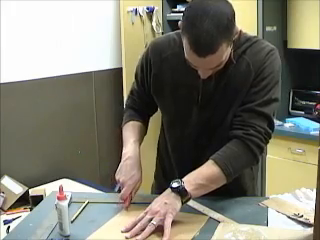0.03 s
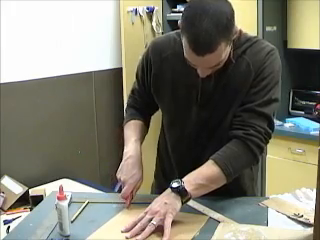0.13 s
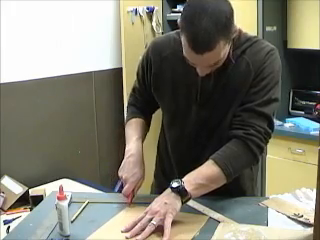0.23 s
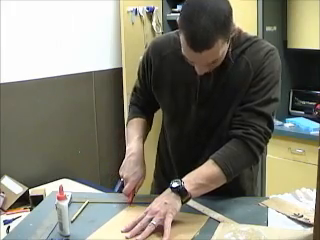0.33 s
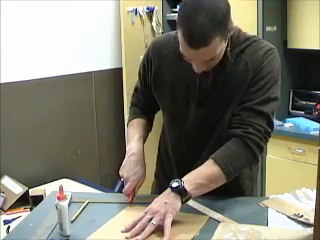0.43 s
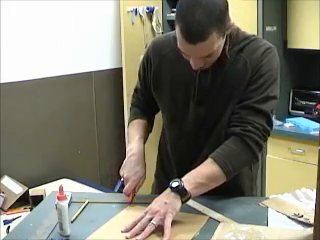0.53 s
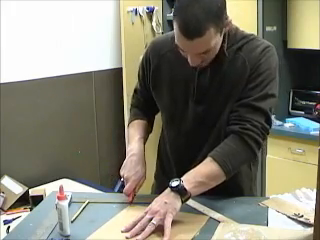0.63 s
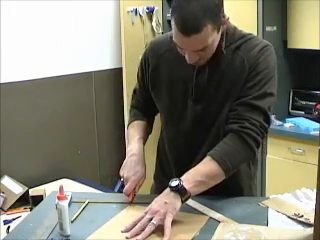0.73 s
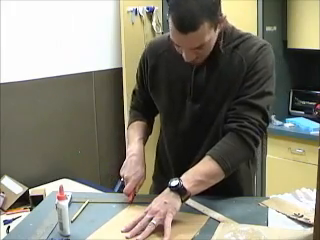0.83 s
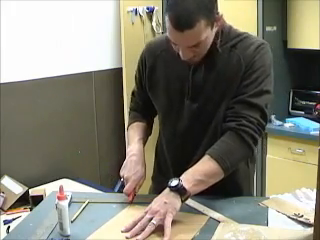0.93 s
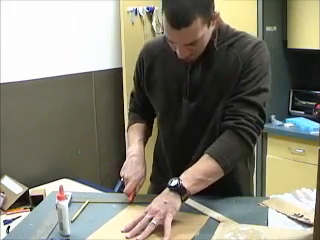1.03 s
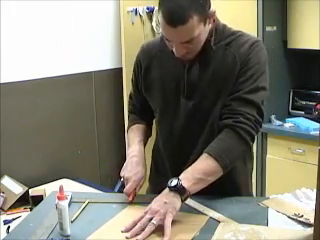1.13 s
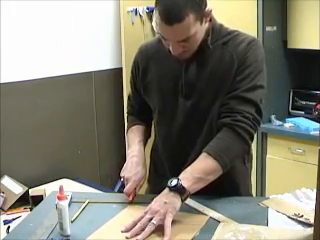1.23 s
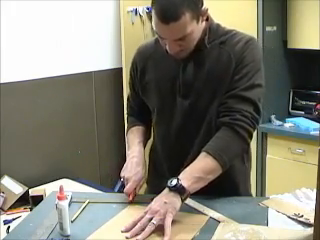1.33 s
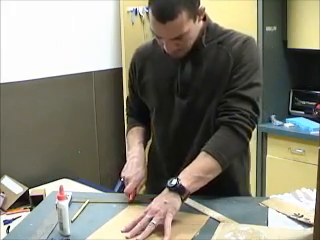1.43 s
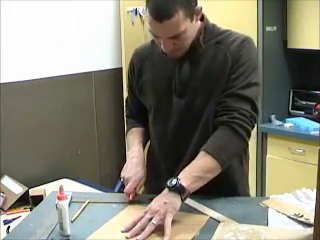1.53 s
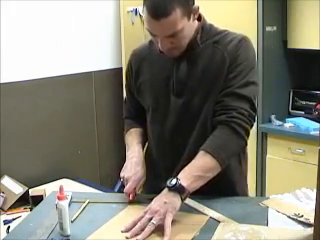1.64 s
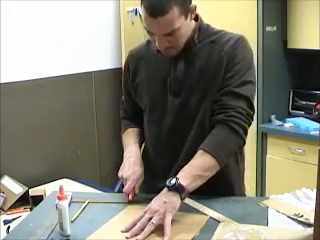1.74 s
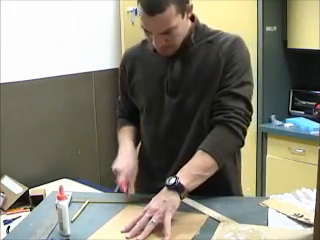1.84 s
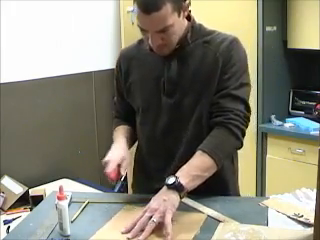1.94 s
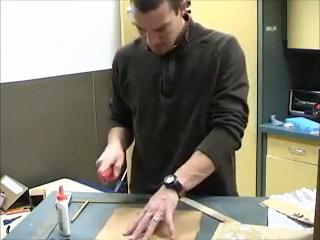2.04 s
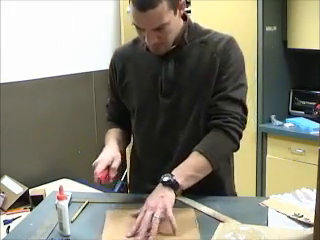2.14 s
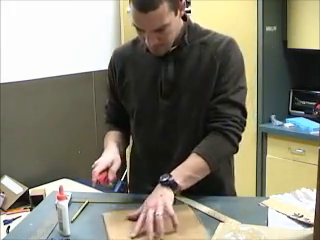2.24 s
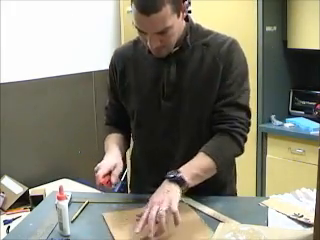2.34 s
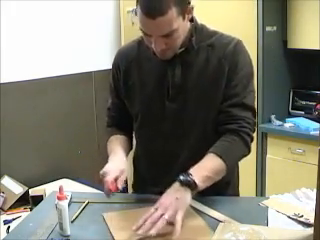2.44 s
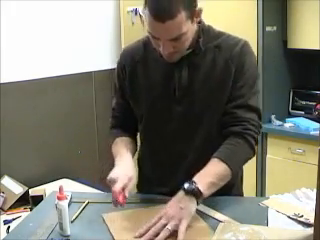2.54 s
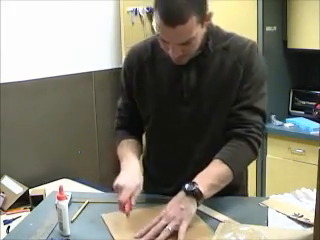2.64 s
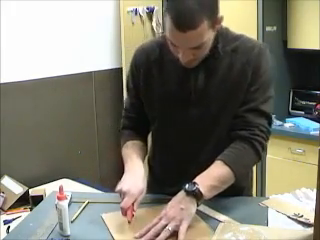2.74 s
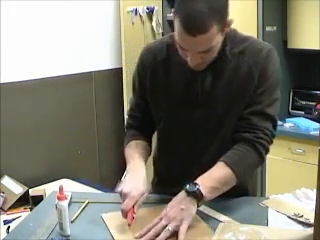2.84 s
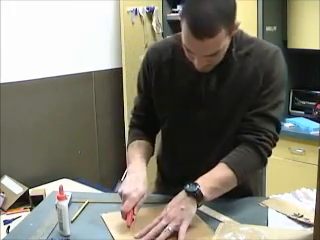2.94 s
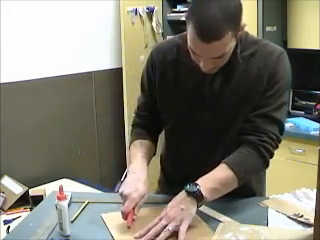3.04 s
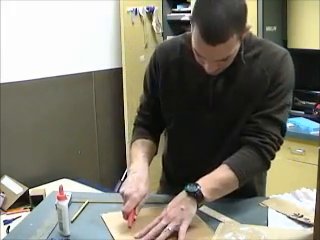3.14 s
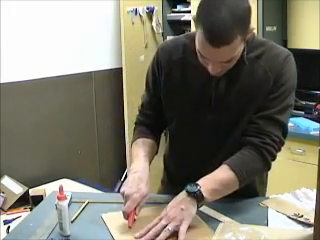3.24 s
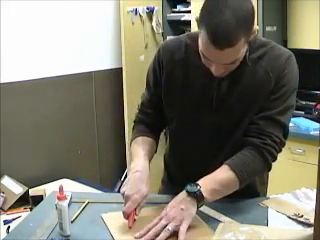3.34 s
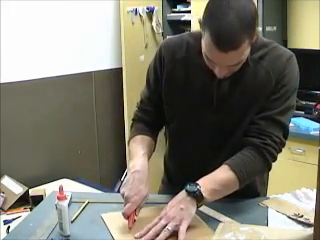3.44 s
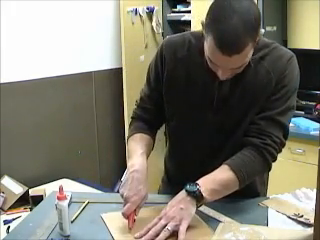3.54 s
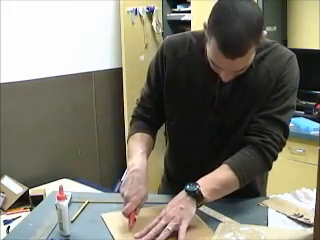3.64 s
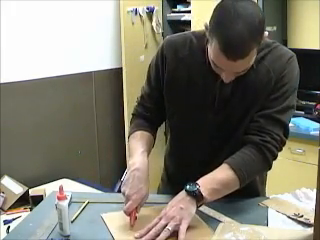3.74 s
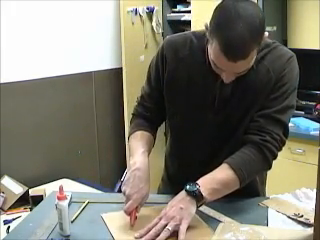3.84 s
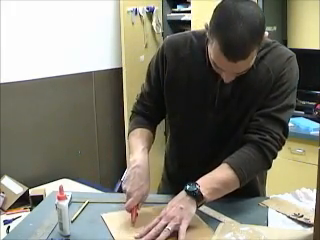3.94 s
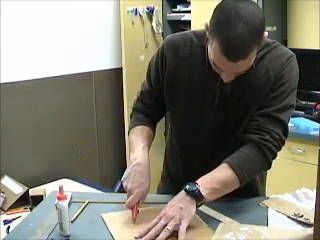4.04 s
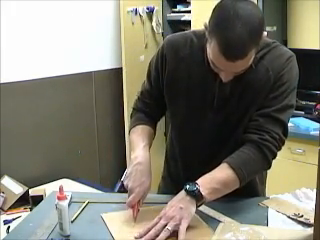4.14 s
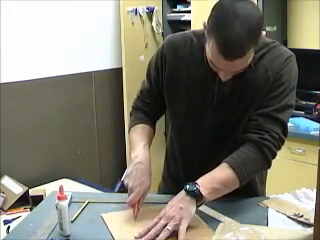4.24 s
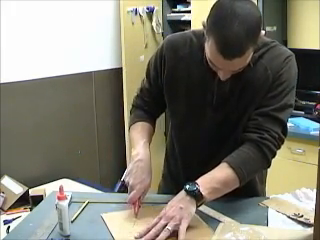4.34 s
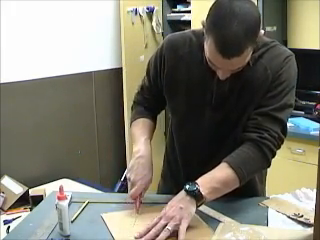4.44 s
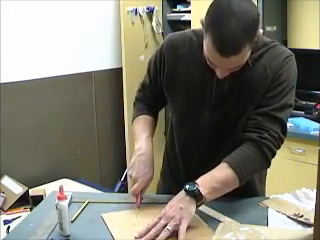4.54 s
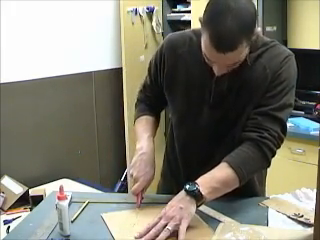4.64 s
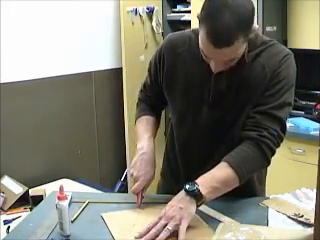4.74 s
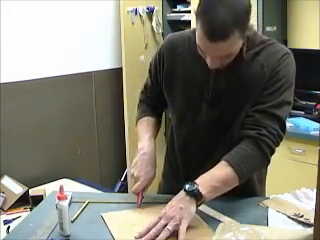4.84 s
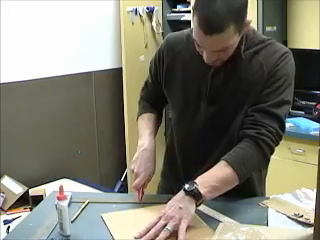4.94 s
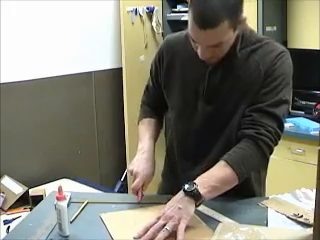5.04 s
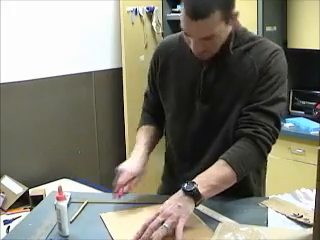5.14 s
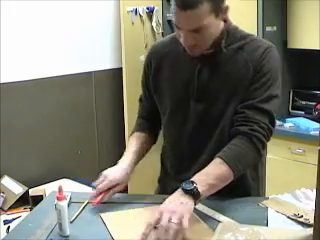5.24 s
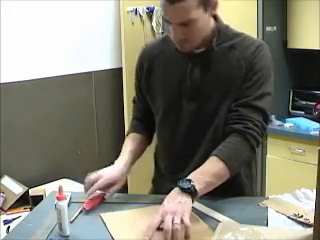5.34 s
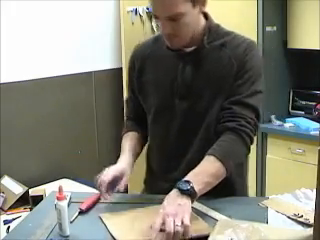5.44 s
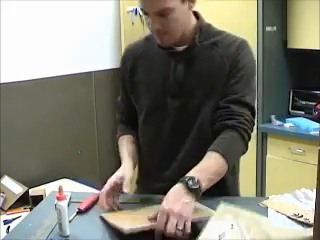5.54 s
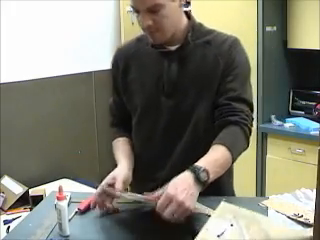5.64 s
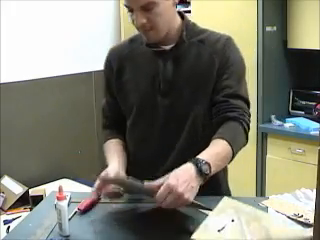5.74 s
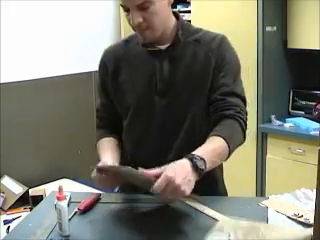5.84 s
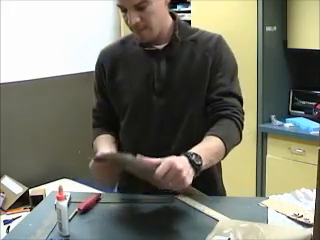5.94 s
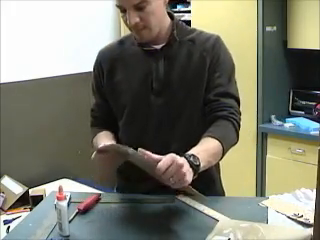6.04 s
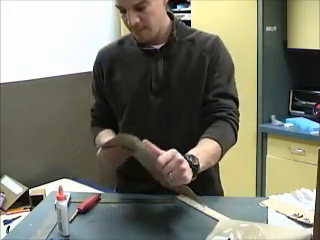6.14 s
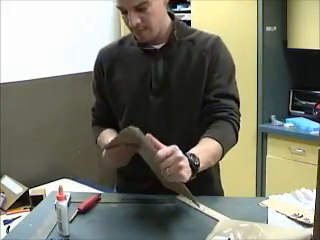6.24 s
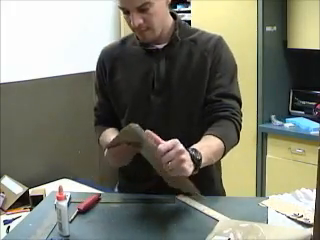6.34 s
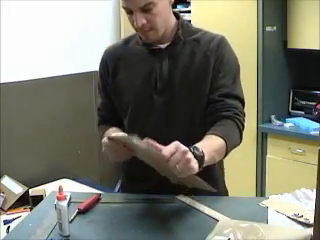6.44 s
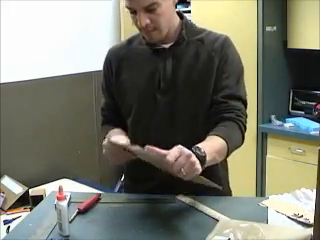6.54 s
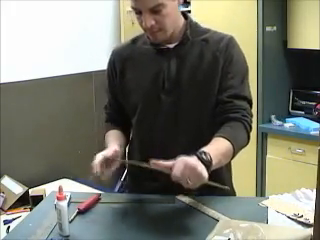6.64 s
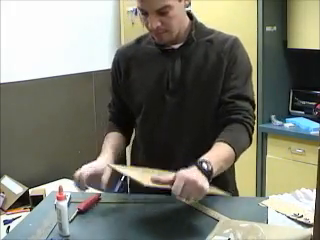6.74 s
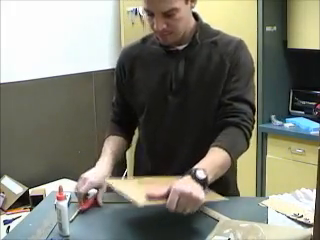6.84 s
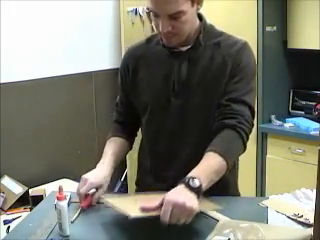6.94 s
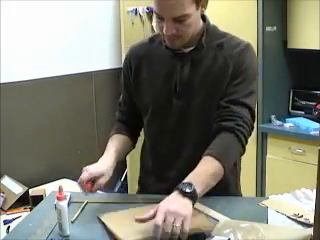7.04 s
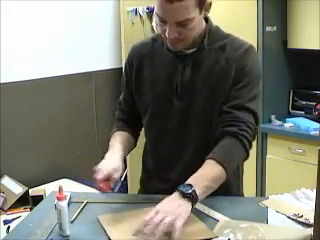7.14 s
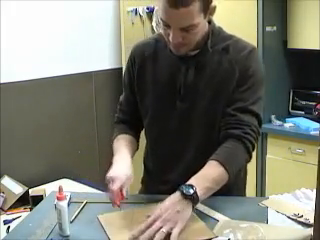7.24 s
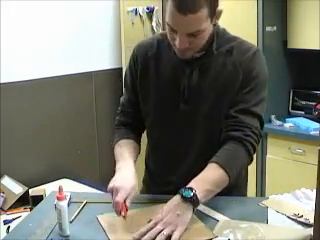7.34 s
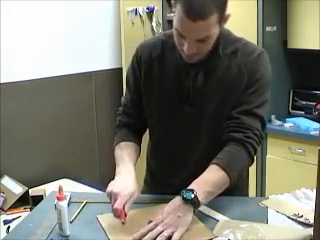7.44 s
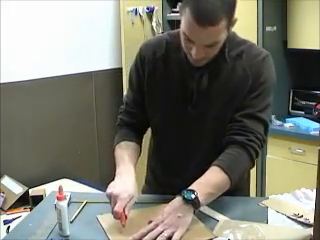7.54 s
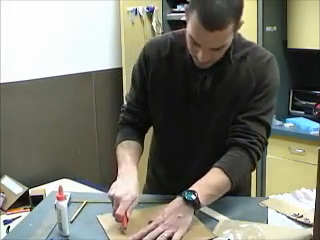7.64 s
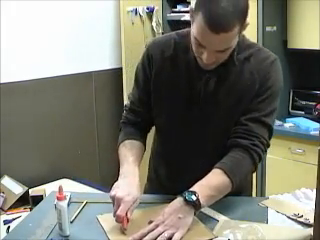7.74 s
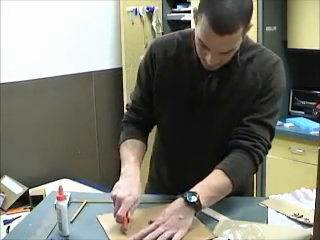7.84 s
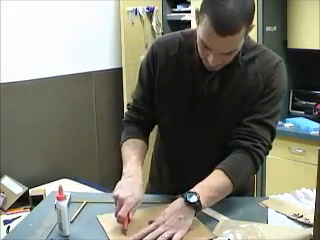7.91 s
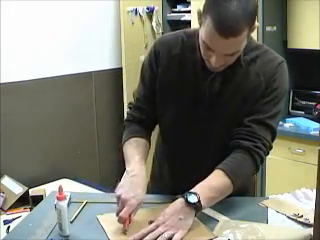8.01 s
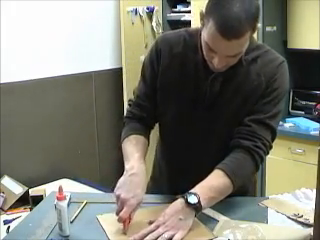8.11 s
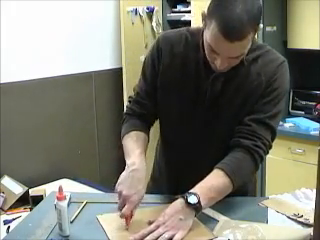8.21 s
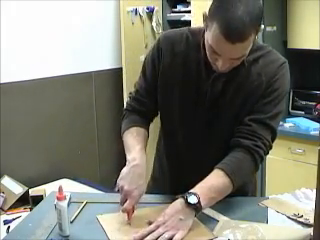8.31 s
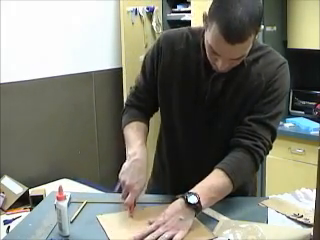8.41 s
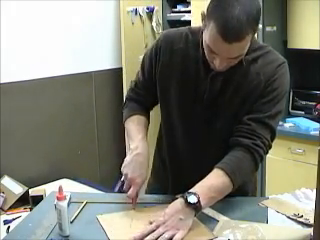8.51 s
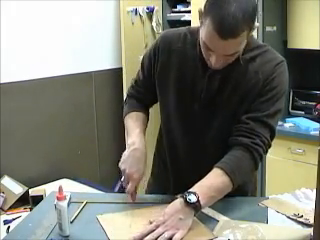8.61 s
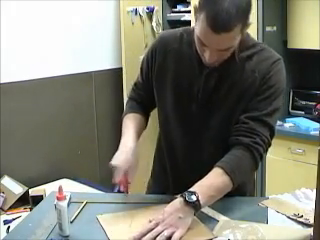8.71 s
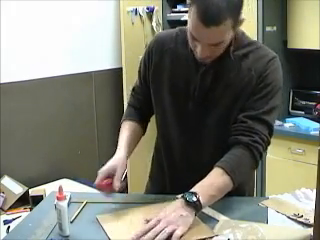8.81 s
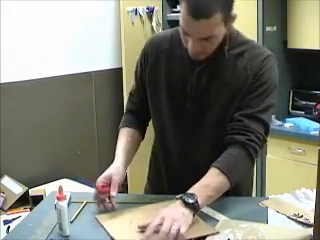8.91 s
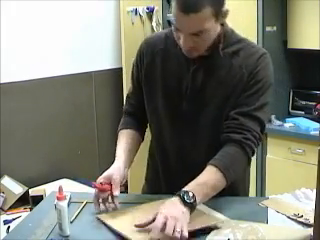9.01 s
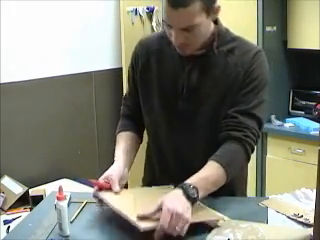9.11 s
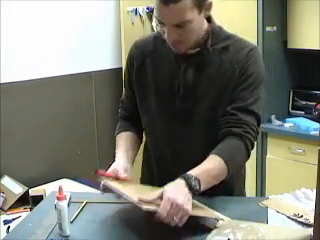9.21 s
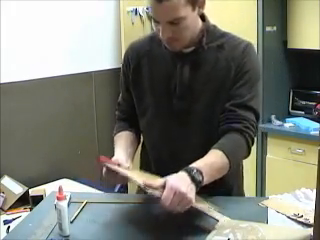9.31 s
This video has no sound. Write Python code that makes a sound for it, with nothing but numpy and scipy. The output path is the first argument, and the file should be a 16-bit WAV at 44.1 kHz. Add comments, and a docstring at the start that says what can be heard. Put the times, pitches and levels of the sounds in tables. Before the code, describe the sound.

Scratchy blade cuts in cardboard, papery shuffles and hollow table knocks, then one loud ripping pull, in a small humming workshop.

```python
"""A box cutter is drawn through corrugated cardboard on a worktable in a small workshop.
The cuts, slides and drags are dense showers of snapping fibres, filtered and levelled in three zones.
Snaps and blows are sharp contacts; knocks and worktop booms are decaying modes.
A tape camcorder hears it through the room's short ring, over mains hum, motor whine and moving air."""
import sys
import numpy as np
from scipy import signal
from scipy.fft import rfft, irfft
from scipy.io import wavfile

SR = 44100
rng = np.random.default_rng(int(sys.argv[2]) if len(sys.argv) > 2 else 0)


def to_wav(s):
    """Save 16-bit WAV."""
    ch = np.atleast_2d(s).T  # columns
    pcm = np.round(np.clip(ch, -1, 1) * 32767)  # PCM
    wavfile.write(sys.argv[1], SR, pcm.astype(np.int16))


N = 413216
TIME = np.arange(N) / SR
ROOM_DB = -3.5  # echoes of a clack re its direct sound

# zones of every contact: board body, rasp, paper fizz: low_hz, high_hz
ZONES = [(80, 1200), (1200, 5000), (5000, 12500)]
# spectrum of a blow on the table: freq_hz, level_db
BLOW_COLOUR = [(80, -32.5), (210, -12), (340, -7.5), (470, -5), (650, 4), (900, 6), (1300, 7), (1850, 7.5),
               (2600, 6.5), (3500, 1.5), (4800, 1.5), (9500, -9), (12000, -16)]


def undb(db):
    """Decibels to gain."""
    return 10 ** (np.asarray(db) / 20)


def unit(x):
    """Scale to rms 1."""
    return x / np.sqrt(np.mean(x ** 2) + 1e-18)


def band(x, lo_hz, hi_hz):
    """Causal band-pass."""
    sos = signal.butter(3, [lo_hz, hi_hz], "band", fs=SR, output="sos")
    return signal.sosfilt(sos, x + 1e-18)


def in_zones(x, levels_db):
    """Split into body, rasp and fizz; set the level of each."""
    return sum(unit(band(x, *zone)) * undb(db) for zone, db in zip(ZONES, levels_db))


def resonate(x, hz, width_hz):
    """One resonance, gain 1 at its centre."""
    return signal.lfilter(*signal.iirpeak(hz, hz / width_hz, fs=SR), x + 1e-18)


def colour(x, points, size=4096):
    """Minimum-phase filter through (freq_hz, level_db) points."""
    hz, db = np.transpose(points)
    bin_hz = np.arange(size // 2 + 1) * SR / size
    log_gain = np.log(undb(np.interp(np.log(bin_hz + 1), np.log(hz), db)))
    cepstrum = irfft(log_gain)[:size // 2]
    cepstrum[1:] *= 2  # folding makes it causal
    impulse = irfft(np.exp(rfft(cepstrum, size)))
    return signal.fftconvolve(x, impulse)[:len(x)]


def walk(rate_hz, n):
    """Random values joined by straight lines, spread near 1."""
    steps = np.arange(n) / SR * rate_hz
    return 1.2 * np.interp(steps, np.arange(4096), rng.standard_normal(4096))


def add(out, s, x):
    """Mix x into out from time s on."""
    i = max(int(s * SR), 0)
    out[i:i + len(x)] += x[:max(N - i, 0)]


def room_tail(size=16384):
    """Dense reflections of a small hard room, energy 1; the treble dies first."""
    # decay time per zone: t60_s
    zone_t60_s = [0.35, 0.31, 0.27]
    t = np.arange(size) / SR
    noise = rng.standard_normal(size)
    tail = sum(band(noise, *zone) * np.exp(-np.log(1000) * t / t60_s)
               for zone, t60_s in zip(ZONES, zone_t60_s))
    onset = np.clip(t / 0.0021, 0, 1)
    return unit(tail * onset) / np.sqrt(size)


def in_room(x, wet_db):
    """Direct sound plus reflections; each call draws its own echoes."""
    wet = undb(wet_db)
    out = wet * signal.fftconvolve(x, room_tail())
    out[:len(x)] += x
    return out / np.sqrt(1 + wet ** 2)


def board(x):
    """The sheet passes a push on and rings a little with it."""
    # resonances of the sheet on the table: freq_hz, width_hz, level_db
    resonances = [(214, 11, 10), (621, 68, -1.5), (1046, 56, -3.5), (1613, 33, 0.5), (1870, 94, -15),
                  (3240, 190, -11)]
    return x + sum(undb(db) * resonate(x, hz, width_hz) for hz, width_hz, db in resonances)


def friction(movements, spectrum, fibres_per_s, spread_db, catch_rate_hz, catch_db, wet_db):
    """Fibres break one by one; the edge catches and slips, so strong breaks come in clusters."""
    out = np.zeros(N)
    for movement in movements:
        s, rasp_db, body_db, fizz_db = np.transpose(movement)
        t = np.arange(s[0], s[-1], 1 / SR)
        chance, size, sign = rng.random((3, 2 * SR))[:, :len(t)]
        strength = undb(-spread_db * np.log(size + 0.087))
        breaks = (chance < fibres_per_s / SR) * np.sign(sign - .5) * strength
        catches = undb(catch_db * walk(catch_rate_hz, len(t)))
        sound = colour(board(breaks * catches), spectrum)
        levels_db = [np.interp(t, s, db) for db in (rasp_db + body_db, rasp_db, rasp_db + fizz_db)]
        fade = np.clip(np.minimum(t - s[0], s[-1] - t) / 0.00055, 0, 1)
        add(out, s[0], in_room(in_zones(sound, levels_db) * fade, wet_db))
    return out


def strokes(table, release_db_per_s, body_db, fizz_db):
    """Each stroke rises evenly, swells or eases, dies away; a bright one has more fizz, less body."""
    depth_db = 25
    out = []
    for start_s, length_s, attack_s, db, swell_db, bright_db in table:
        t = np.linspace(0, length_s + depth_db / release_db_per_s, 256)
        rise_db = 20 * np.log10(np.clip(t / attack_s, undb(-depth_db), 1))
        swelling_db = swell_db * np.minimum(t / length_s, 1)
        release_db = release_db_per_s * np.maximum(t - length_s, 0)
        level_db = db + rise_db + swelling_db - release_db
        out.append([(start_s + s, now_db, body_db - bright_db, fizz_db + bright_db)
                    for s, now_db in zip(t, level_db)])
    return out


def sweep(curve, body_db, fizz_db, body_growth, fizz_growth):
    """One long movement: body and fizz grow by their own number of dB for each dB of rasp."""
    s, db = np.transpose(curve)
    below_peak_db = db.max() - db
    body = body_db + (1 - body_growth) * below_peak_db
    fizz = fizz_db + (1 - fizz_growth) * below_peak_db
    return [np.column_stack([s, db, body, fizz])]


def contact(crumble_s, crumble_db, size=8192):
    """One sharp push, then a dying shower of smaller contacts."""
    t = np.arange(size) / SR
    shower = rng.standard_normal(size) * (rng.random(size) < .1) * np.exp(-t / crumble_s)
    push = undb(crumble_db) * unit(shower) / np.sqrt(size)
    push[0] += 1
    return push


def hits(table, spectrum, crumble_s, crumble_db, wet_db):
    """Contacts through the sheet, each fading into an even wash of echoes."""
    out = np.zeros(N)
    for s, db, body_db, fizz_db in table:
        push = contact(crumble_s, crumble_db, size=12000)
        echoes = undb(wet_db) * room_tail(size=12000)
        sound = colour(board(push / np.linalg.norm(push) + echoes), spectrum)
        add(out, s, in_zones(sound, (db + body_db, db, db + fizz_db)))
    return out


def mode(hz, t60_s, size=8192):
    """A struck mode dying away."""
    t = np.arange(size) / SR
    return np.sin(2 * np.pi * hz * t) * np.exp(-np.log(1000) * t / t60_s)


def cuts():
    """Short cuts: the blade bites, runs and stops, breaking fibres."""
    # start_s, length_s, attack_s, level_db, swell_db, brightness_db
    table = [(0.0, 0.19, 0.0013, -33.5, -5.5, 0.5), (0.218, 0.032, 0.019, -32, -3.5, -1),
             (0.274, 0.12, .01, -32.5, -4.5, 0), (0.84, 0.05, 0.042, -41.5, 1.5, 3.5),
             (3.743, 0.058, 0.0047, -35.5, -4.5, 1.5), (3.802, 0.019, 0.013, -40, 4.5, 0.5),
             (3.979, 0.13, .005, -34, 4.5, -0.5), (4.165, 0.048, 0.0095, -36.5, -4, -3.5),
             (4.27, 0.047, 0.03, -34.5, -1.5, 0), (4.35, .087, 0.017, -31.5, -5.5, 0.5),
             (4.441, 0.19, .004, -32.5, 4, -0.5), (4.752, 0.041, 0.036, -33.5, -2, 2),
             (4.958, 0.056, 0.0072, -36.5, 5, -2)]
    # freq_hz, level_db
    spectrum = [(50, -20), (92, 2.5), (140, -7.5), (210, -9.5), (280, -4.5), (450, -10), (650, -3),
                (900, -7), (1400, -2), (2200, 11.5), (3800, 9), (6000, -1.5), (9000, -1.5), (12000, -15)]
    movements = strokes(table, release_db_per_s=430, body_db=-2.5, fizz_db=-3.5)
    return friction(movements, spectrum, fibres_per_s=3000, spread_db=3,
                    catch_rate_hz=105.6, catch_db=3.0, wet_db=-3.5)


def pull():
    """One long, hard pull of the blade, its fibre shower following a rasp curve."""
    # time_s, rasp_db
    curve = [(8.22, -60), (8.278, -33), (8.308, -40), (8.316, -32.5), (8.398, -33.5), (8.43, -22),
             (8.498, -30), (8.548, -18.5), (8.64, -23.5), (8.708, -33), (8.724, -59), (8.82, -77)]
    # freq_hz, level_db
    spectrum = [(80, -1), (150, -12), (240, -9), (330, 1.5), (450, -11), (620, -0.5), (760, 5.5),
                (940, 0.5), (1090, 6), (1250, 0), (1400, -3), (1750, 0.5), (2400, -3.5), (3500, -0.5),
                (5200, -11.5), (9000, -16.5), (12000, -24.5)]
    movements = sweep(curve, body_db=-8.5, fizz_db=-12.5, body_growth=0.6, fizz_growth=0.73)
    return friction(movements, spectrum, fibres_per_s=3000, spread_db=4.0,
                    catch_rate_hz=220, catch_db=1.0, wet_db=-3.0)


def snaps():
    """The liner pops under the blade or cracks along the cut: a push and a brief crumble."""
    # start_s, rasp_db, body_re_rasp_db, fizz_re_rasp_db
    table = [(0.0276, -51, -8, 5), (0.2783, -41.5, -6, 1.5), (0.739, -55, 1, -10), (1.1243, -59.5, -2, -13),
             (1.3997, -64, -9, 6), (1.4865, -55.5, -7, 2.5), (1.529, -46.5, -9, -8), (1.7549, -57, -5, -7),
             (2.6366, -50.5, -14, -6), (3.0624, -61, -1, -14), (3.3808, -57.5, -5, -14),
             (3.528, -35, -5, -0.5), (3.5339, -48.5, 10.5, -14), (3.9802, -55, -4, 7.5),
             (4.1045, -45.5, 0, -2), (4.4424, -43.5, -8, -0.5), (4.4976, -43.5, -22, -0.5),
             (4.5942, -41, -9, 3.5), (4.9681, -52, -3, 6.5), (6.2325, -52, -7, 11), (6.246, -31, -5.5, 1.5),
             (8.114, -48, -8, -6.5), (8.3436, -49.5, 5, -14), (8.4221, -39.5, 7, -15),
             (8.5387, -38, 2, -11), (8.7248, -39.5, -30, -15.5)]
    # freq_hz, level_db
    spectrum = [(80, -44), (150, -39), (250, -15), (480, -12.5), (1000, -7.5), (1200, -7.5), (1550, 4.5),
                (2500, 7), (6000, 1.5), (9500, 1.5), (12000, -8.5)]
    return hits(table, spectrum, crumble_s=.004, crumble_db=2, wet_db=0)


def drag():
    """The sheet is swivelled flat on the table: very dense, even friction."""
    # time_s, rasp_db
    curve = [(1.87, -61), (1.91, -46.5), (2.012, -55), (2.046, -44), (2.126, -49), (2.144, -41.5),
             (2.206, -46), (2.262, -38), (2.282, -45), (2.404, -36), (2.462, -63), (2.5, -61)]
    # freq_hz, level_db
    spectrum = [(80, -21), (200, -8), (450, 1), (1300, -8.5), (2000, -3), (2800, -1.5), (4500, 0.5),
                (6000, 0.5), (9000, -1.5), (12000, -12)]
    movements = sweep(curve, body_db=-17, fizz_db=-2.5, body_growth=0.38, fizz_growth=0.95)
    return friction(movements, spectrum, fibres_per_s=14000, spread_db=1.5,
                    catch_rate_hz=61.4, catch_db=0.0, wet_db=-9.0)


def slides():
    """The hands shift and rub the sheet in short friction strokes."""
    # start_s, length_s, attack_s, level_db, swell_db, brightness_db
    table = [(1.53, 0.32, 0.048, -57.5, -12.5, -16), (3.2, .08, 0.053, -55, 3, -11),
             (3.3, 0.18, .04, -66, 8.5, -10), (5.12, 0.17, 0.072, -49, 1, 1),
             (5.545, 0.028, 0.015, -24, -3, 0.5), (5.59, 0.13, 0.032, -33, -12, 1),
             (5.735, 0.059, 0.029, -35.5, -2.5, 2.5), (5.825, 0.065, 0.02, -38, 1, 3.5),
             (5.912, 0.015, 0.014, -30.5, -2.5, 1.5), (6.05, 0.23, 0.018, -47, 1.5, -1),
             (6.49, 0.096, 0.024, -41.5, -9.5, -3), (6.59, .13, 0.018, -53.5, 7.5, 4.5),
             (6.74, 0.18, 0.018, -51.5, -2.5, -6), (6.79, 0.015, 0.0098, -42.5, -3, 3.5),
             (7.06, 0.16, .03, -48, 6, 0), (7.325, 0.056, 0.025, -47, -0.5, 4.5),
             (7.992, 0.043, 0.031, -37, -3.5, 4.5), (7.99, 0.28, .03, -55.5, 11, 0),
             (8.865, 0.075, 0.034, -43, -2.5, 4), (9.02, .33, 0.014, -44.5, 1.5, 3)]
    # freq_hz, level_db
    spectrum = [(88, -82), (150, -36), (209, -5), (297, 2), (490, 0.5), (1170, -1.5), (4430, -4.5),
                (10800, -15), (11800, -26), (12500, -35), (16200, -65), (22000, -120)]
    movements = strokes(table, release_db_per_s=308, body_db=-4.5, fizz_db=-6.0)
    return friction(movements, spectrum, fibres_per_s=5000, spread_db=3,
                    catch_rate_hz=63.8, catch_db=-0.5, wet_db=-8.5)


def blows():
    """Knife and sheet strike the table: a push and a strong crumble."""
    # start_s, rasp_db, body_re_rasp_db, fizz_re_rasp_db
    table = [(4.1759, -42, -2, -7.5), (5.0255, -31.5, -9.5, -4.5), (5.0745, -36.5, -9, -16),
             (5.3913, -31.5, 0.5, -1), (5.4291, -21.5, -11.5, -8), (5.4434, -40, 11.5, -10),
             (5.464, -29.5, -5, -7), (5.9744, -39.5, 0.5, -11), (6.5205, -63, 10, 6), (6.9366, -42, -7, -8),
             (6.9834, -37.5, -6.5, -7), (7.1243, -54, -0.5, 1.5), (7.207, -47, -6, -22),
             (7.8046, -58, -3, -6), (8.9538, -41.5, -9, -14)]
    return hits(table, BLOW_COLOUR, crumble_s=0.0032, crumble_db=6.5, wet_db=1.5)


def knocks(ring_wet_db, contact_s):
    """Hollow knocks: a clack and one quickly dying mode that swells while the contact lasts."""
    # knife and sheet: start_s, level_db, pitch_hz, t60_s, clack_re_ring_db
    table = [(5.075, -31.5, 3240, 0.016, -5.5), (5.393, -26, 1828, 0.031, 2),
             (5.444, -32, 1370, 0.035, -15), (5.974, -40, 1015, 0.032, -1.5), (5.985, -58, 490, 0.11, -10),
             (6.247, -42, 1480, 0.07, -18), (6.52, -56, 770, 0.078, -13), (6.799, -51, 1450, 0.069, -4),
             (6.944, -36, 1593, 0.1, 0), (6.945, -46, 4447, 0.05, -11), (6.979, -42.5, 1224, 0.064, -5),
             (7.125, -50.5, 632, 0.07, -26), (8.973, -44, 1593, 0.19, 2), (8.977, -39.5, 655, 0.042, -9),
             (8.995, -45.5, 388, 0.13, -17), (9.3, -30, 1950, 0.12, -5)]
    out = np.zeros(N)
    for s, db, hz, t60_s, clack_db in table:
        clack = in_room(unit(colour(contact(0.013, 9.9), BLOW_COLOUR)), ROOM_DB)
        ring = mode(hz, t60_s)
        swell = 1 - np.exp(-TIME[:len(ring)] / contact_s)
        ring = in_room(unit(ring * swell), ring_wet_db)
        add(out, s, undb(db) * (ring + undb(clack_db) * clack))
    return out


def bumps(wet_db):
    """The bumped worktop booms briefly in its modes, a little differently each time."""
    # start_s, level_db
    table = [(3.533, -44), (5.441, -40), (5.984, -43.5), (6.983, -44.5), (7.21, -50.5), (8.987, -47.5)]
    # modes of the worktop: freq_hz, level_db, t60_s
    modes = [(208, -6, 0.62), (242, -3.5, 0.46), (335.5, -2, 0.32), (370, -15.5, 0.22), (494, -3, 0.3)]
    out = np.zeros(N)
    for s, db in table:
        boom = 0
        for hz, mode_db, t60_s in modes:
            detune = 1 + 0.027 * rng.standard_normal()
            boom = boom + undb(mode_db) * mode(hz * detune, t60_s) * rng.choice([-1, 1])
        add(out, s, in_room(undb(db) * unit(boom), wet_db))
    return out


def mains_hum():
    """Steady sines at multiples of the mains frequency."""
    # mains_multiple, rms_db
    harmonics = [(1, -51), (2, -45.5), (3, -71.5)]
    mains_hz = 60
    return sum(np.sqrt(2) * undb(db) * np.sin(2 * np.pi * (round(k) * mains_hz * TIME + rng.random()))
               for k, db in harmonics)


def motor_whine():
    """Wavering motor and fan tones: one noise through pairs of equal resonances."""
    # freq_hz, width_of_each_resonance_hz, rms_db
    tones = [(93.2, 31, -55), (900, 39, -59), (1160, 13, -69), (3970, 280, -65), (5160, 380, -63.5),
             (6730, 47, -71)]
    flutter = rng.standard_normal(N)
    return sum(undb(db) * unit(resonate(resonate(flutter, hz, width_hz), hz, width_hz))
               for hz, width_hz, db in tones)


def air():
    """A gently wavering rush of air over a low ventilation rumble, both coloured noise."""
    # freq_hz, level_db
    rush_spectrum = [(100, -8), (220, -15), (330, 0), (600, -1), (950, -3), (1400, -2), (3000, -5),
                     (5200, -10.5), (7500, -12.5), (10000, -20), (12000, -31)]
    # freq_hz, level_db
    rumble_spectrum = [(10, -30), (23, 6), (36, 11.5), (55, 8), (75, 1), (100, 3), (140, 2), (190, 2.5),
                       (240, -1), (400, -37.5)]
    rush_db, rumble_db = -53.5, -51.5
    rush = colour(rng.standard_normal(N), rush_spectrum) * undb(1.2 * walk(5, N))
    rumble = colour(rng.standard_normal(N), rumble_spectrum)
    return undb(rush_db) * unit(rush) + undb(rumble_db) * unit(rumble)


def background():
    """Hum, whine and air add up to the noise floor."""
    return mains_hum() + motor_whine() + air()


def stereo(work, floor, echo_side_db):
    """Close microphones: only faint echoes, motor noise and air differ between left and right."""
    # difference in the echoes, mostly middle range: freq_hz, level_db
    echo_spectrum = [(60, -17), (350, -85), (800, -10), (2200, 10), (3500, -42), (9000, -20)]
    # difference in motor and air noise: freq_hz, level_db
    floor_spectrum = [(24, -18), (45, -6), (115, -6), (160, -14), (380, -5.5), (620, -6.5), (900, 8.5),
                      (1500, -10), (2200, -17), (2800, -39), (12000, -45)]
    floor_side_db = -63
    reverberant = signal.oaconvolve(work, room_tail())[:N]
    echoes = undb(echo_side_db) * colour(reverberant, echo_spectrum)
    noise = undb(floor_side_db) * unit(colour(rng.standard_normal(N), floor_spectrum))
    side = echoes + noise
    return np.array([work + floor + side, work + floor - side])


def scene():
    """Knife, cardboard and worktop in the humming room."""
    work = cuts() + pull() + snaps() + drag() + slides() + blows()
    work += knocks(ring_wet_db=-9, contact_s=0.002)
    work += bumps(wet_db=-13.5)
    return stereo(work, background(), echo_side_db=-39.5)


def record(dry):
    """The camcorder dips every multiple of its head drum's speed, rounds loud peaks, cuts the top."""
    drum_hz, top_hz = 150.15, 12050
    freq_hz = np.arange(N // 2 + 1) * SR / N
    turn = np.exp(-2j * np.pi * freq_hz / drum_hz)  # delay of one drum turn
    comb = (1 - .78 * turn) / (1 - .55 * turn)
    sound = irfft(rfft(dry) * comb, N)
    sound = sound / (1 + (sound / .72) ** 6) ** (1 / 6)
    return signal.sosfilt(signal.ellip(10, .2, 70, top_hz, fs=SR, output="sos"), sound)


dry = scene()
out = record(dry)
to_wav(out)
```